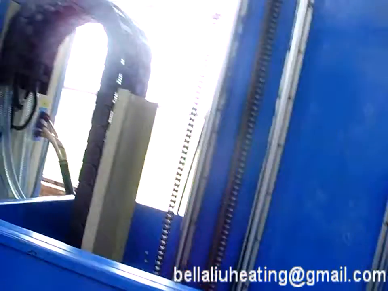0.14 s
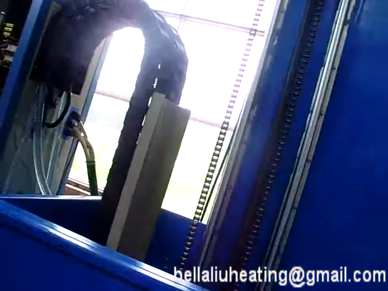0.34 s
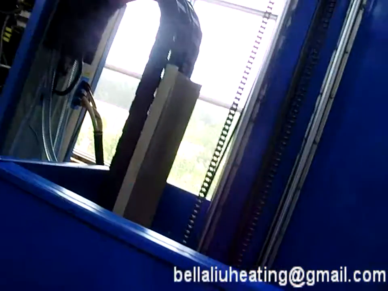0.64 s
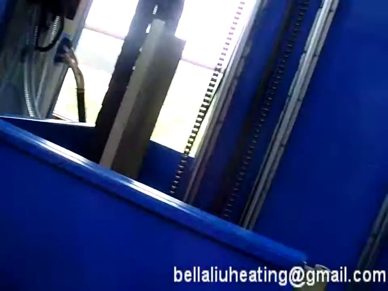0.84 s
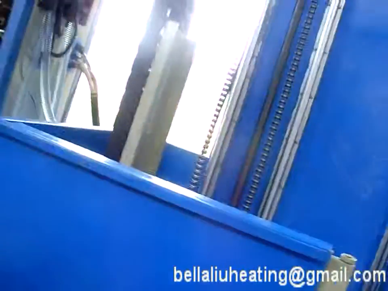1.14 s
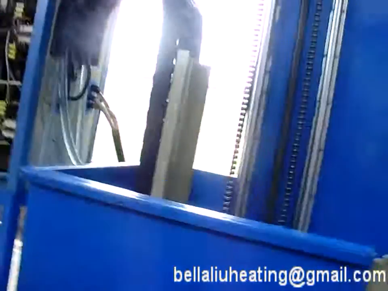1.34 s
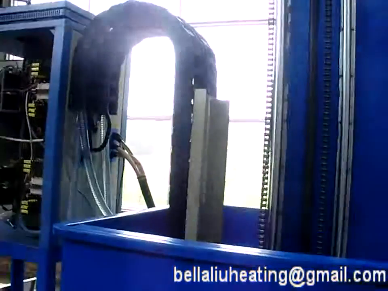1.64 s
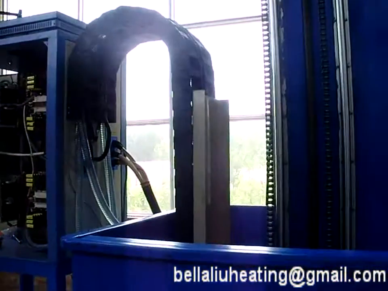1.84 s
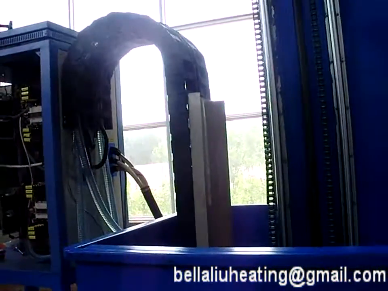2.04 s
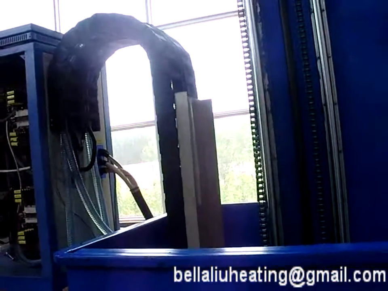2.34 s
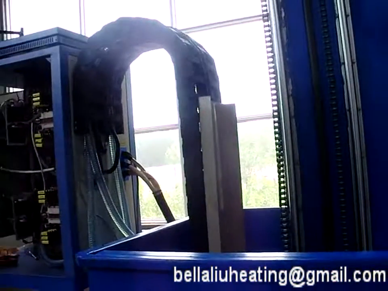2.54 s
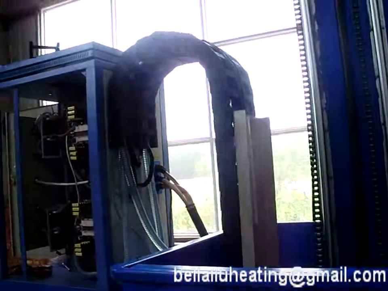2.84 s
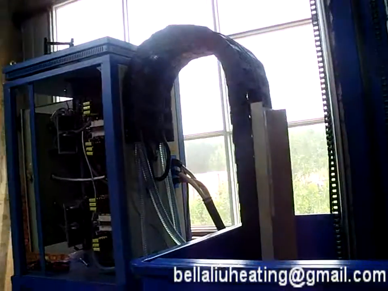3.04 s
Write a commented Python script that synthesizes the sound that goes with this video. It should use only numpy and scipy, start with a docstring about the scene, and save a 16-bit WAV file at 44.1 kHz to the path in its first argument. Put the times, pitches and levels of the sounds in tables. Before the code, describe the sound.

Steady dense machine roar and throbbing hum in a workshop, with irregular dull chain clacks.

```python
"""An industrial machine runs steadily: fans and pumps roar through the casing, as two bands of noise.
A thin patchy top, left around 4 kHz by earlier processing, is a third noise that follows the roar.
Two motor shafts hum as sines at multiples of their speeds, amid loose tones, a drone and a throbbing hum.
A thin high ring swells near 1 s, then flickers away, with a mirror image from earlier 8 kHz sampling.
A drive chain ticks and clacks, as noise bursts dulled by a small camera microphone, over faint hiss."""
import sys
import numpy as np
from scipy import signal
from scipy.fft import rfft, irfft, next_fast_len
from scipy.io import wavfile
from scipy.ndimage import uniform_filter1d, map_coordinates

SR = 44100
rng = np.random.default_rng(int(sys.argv[2]) if len(sys.argv) > 2 else 0)


def wrap_up_sound(samples):
    """Save the sound to the file named by the first command line argument, as 16-bit audio."""
    columns = np.atleast_2d(samples).T
    # keep every value between -1 and 1, then stretch to whole-number steps
    tamed = np.clip(columns, -1, 1)
    steps = np.round(tamed * 32767).astype(np.int16)
    wavfile.write(sys.argv[1], SR, steps)


def gain_from_decibels(decibels):
    """Convert decibel values to linear amplitude factors."""
    exponent = np.asarray(decibels, float) / 20
    return 10 ** exponent


N = 141120
T = np.arange(N) / SR


def unit(x):
    """Scaled to rms 1."""
    return x / np.sqrt(np.mean(x ** 2) + 1e-20)


def along(points, hz):
    """Interpolates (Hz, value) points on a log frequency axis."""
    point_hz, value = np.transpose(points)
    return np.interp(np.log(hz + 1), np.log(point_hz + 1), value)


def curve(rows):
    """One value per sample from (s, value) rows."""
    return np.interp(T, *np.transpose(rows))


def wobble(knots_per_s):
    """A smooth random curve through normally distributed knots."""
    knots = rng.standard_normal(int(N * knots_per_s / SR) + 4)
    return map_coordinates(knots, [T * knots_per_s])


def filtered(x, response):
    """x times a response of frequency."""
    m = next_fast_len(len(x) + 8192)
    return irfft(rfft(x, m) * response(np.fft.rfftfreq(m, 1 / SR)), m)[:len(x)]


def noise(spectrum, patchy_db):
    """Coloured noise of rms 1, its gain patchy over time and frequency."""
    white = signal.stft(rng.standard_normal(N), nperseg=512)[2]
    patches = uniform_filter1d(rng.standard_normal(white.shape), size=5, axis=0)
    patches = unit(uniform_filter1d(patches, size=8, axis=1))
    x = signal.istft(white * gain_from_decibels(patchy_db * patches), nperseg=512)[1][:N]
    return unit(filtered(x, lambda hz: gain_from_decibels(along(spectrum, hz))))


def tone(pitch_hz, level_db, waver_db):
    """A sine of given rms level, its phase drifting and its level wavering."""
    drift_rad = 0.6 * wobble(3)
    phase_rad = 2 * np.pi * (pitch_hz * T + rng.random()) + drift_rad
    return np.sqrt(2) * gain_from_decibels(level_db + waver_db * wobble(3)) * np.sin(phase_rad)


# level of the low roar: time_s, level_db [rms]
ROAR_LEVEL = [(0.0, -17), (0.03, -18.5), (0.99, -18.5), (1.03, -17), (1.05, -18), (1.49, -20),
              (1.52, -16.5), (1.94, -20), (2.01, -17.5), (2.03, -19.5), (2.17, -17), (2.22, -19),
              (2.7, -19), (2.74, -16.5), (2.91, -19.5), (3.2, -19)]
# colours of low roar and upper rush: freq_hz, density_db [per Hz, relative]
BODY_COLOUR = [(18, -57), (30, -21.5), (96, -14.5), (124, -6.5), (162, -19.5), (196, -9), (236, -12),
               (265, -7), (463, 0), (495, 1), (567, -1.5), (607, -3), (957, -2.5), (1410, -12.5),
               (1700, -17), (2210, -49), (3740, -120)]
RUSH_COLOUR = [(900, -21.5), (1300, -6.5), (1400, -8.5), (1840, -3.5), (2400, -3), (2920, -4), (3300, -8),
               (3650, -12.5), (3780, -13.5), (3900, -27), (4300, -59), (4600, -120)]
# colour of the patchy top left by earlier processing: freq_hz, density_db [per Hz, relative]
PATCHY_TOP_COLOUR = [(3300, -40), (3700, -6.5), (3850, 0), (4000, -1.5), (4300, -1.5), (4600, -7),
                     (4900, -16.5), (5050, -21.5), (5250, -40), (5420, -55), (5600, -89)]


def roar():
    """Air and casing noise in two bands, plus a thin patchy top left around 4 kHz by earlier processing."""
    rush_db, patchy_top_db = -28.5, -50.5
    follow_share = 0.5  # of the low roar's swell in dB, taken by rush and top
    body_db = curve(ROAR_LEVEL)
    upper_db = follow_share * (body_db - body_db.mean()) + 0.34 * wobble(8)
    body = gain_from_decibels(body_db) * noise(BODY_COLOUR, patchy_db=0.74)
    rush = gain_from_decibels(rush_db + upper_db) * noise(RUSH_COLOUR, patchy_db=1.08)
    patchy_top_gain = gain_from_decibels(patchy_top_db + upper_db + 0.58 * wobble(12))
    patchy_top = patchy_top_gain * noise(PATCHY_TOP_COLOUR, patchy_db=2.0)
    return body + rush + patchy_top


# shaft harmonics: order [multiple of shaft speed], level_db [rms before waver]
SHAFT_A_ORDERS = {3: -44, 4: -50.5, 5: -43, 7: -45, 11: -37, 12: -44.5, 14: -40, 17: -35, 22: -40, 23: -31,
                  35: -51.5}
SHAFT_B_ORDERS = {6: -48, 11: -47.5, 12: -38.5, 13: -37.5, 14: -40.5}
# loose steady tones, in pairs: pitch_hz; level_db [rms before waver]
LOOSE_HZ = [62.8, 132.5, 376.8, 388.6, 482.1, 612.2, 643, 707.4, 723.5, 755.2, 827.8, 865.5, 931.4, 1060,
            1124.7, 1184.8]
LOOSE_DB = [-55.5, -40.5, -40, -38, -42.5, -45, -44, -38.5, -40, -39.5, -39.5, -38.5, -40.5, -42, -39.5,
            -43]


def shafts():
    """Sines at multiples of two close shaft speeds, plus loose tones."""
    shaft_a_hz, shaft_b_hz = 24.6, 24.98
    lines = [(order * shaft_a_hz, level_db) for order, level_db in SHAFT_A_ORDERS.items()]
    lines += [(order * shaft_b_hz, level_db) for order, level_db in SHAFT_B_ORDERS.items()]
    lines += list(zip(LOOSE_HZ, LOOSE_DB))
    return sum(tone(pitch_hz, level_db, waver_db=2) for pitch_hz, level_db in lines)


# level of the drone: time_s, level_db [rms before waver]
DRONE_LEVEL = [(0.0, -32), (0.95, -26.5), (0.99, -39), (1.02, -22), (1.13, -32.5), (2.14, -27), (2.24, -38),
               (2.76, -29), (3.2, -40.5)]


def drone():
    """One strong sine of changing level."""
    return tone(508.9, curve(DRONE_LEVEL), waver_db=1.4)


# level of the throbbing hum: time_s, level_db [rms before waver]
THROB_LEVEL = [(0.0, -45), (0.63, -29.5), (0.96, -46.5), (1.07, -29), (1.4, -40), (1.55, -33),
               (1.67, -50.5), (1.82, -38), (2.08, -27.5), (2.18, -38), (2.41, -33.5), (2.5, -39.5),
               (2.83, -28.5), (2.89, -45), (2.93, -40), (3.2, -40)]


def throb():
    """A low sine that swells and sinks repeatedly."""
    return tone(197.8, curve(THROB_LEVEL), waver_db=-0.5)


# the ring, then its mirror image about 4 kHz: pitch_hz
RING_AND_IMAGE_HZ = [3932.3, 4068]
# level of the ring: time_s, level_db [rms before waver]
RING_LEVEL = [(.82, -81), (.87, -55), (.99, -47), (1.03, -61), (1.09, -53), (1.2, -64), (1.3, -54),
              (1.4, -57), (1.6, -59), (1.9, -78)]


def high_ring():
    """A thin high sine, and a second as its mirror image about 4 kHz from earlier 8 kHz sampling."""
    image_offset_db = -2
    ring_hz, image_hz = RING_AND_IMAGE_HZ
    ring = tone(ring_hz, curve(RING_LEVEL), waver_db=-2.2)
    image = tone(image_hz, curve(RING_LEVEL) + image_offset_db, waver_db=-2.2)
    return ring + image


def burst(centre_hz, width_hz, decay_s):
    """Noise in one resonance: quick exponential rise, Gaussian fall."""
    rise_s = 0.002
    t = np.arange(SR // 8) / SR

    def resonance(hz):
        damping = 1j * hz * width_hz
        return damping / (centre_hz * centre_hz - hz * hz + damping)

    envelope = (1 - np.exp(-t / rise_s)) * np.exp(-(t / decay_s) ** 2)
    return unit(filtered(rng.standard_normal(len(t)), resonance)) * envelope


# clacks: start_s, level_db [rms before envelope and microphone], centre_hz, width_hz, decay_s
CLACK_HITS = [(.002, -22.5, 2650, 704, 0.034), (0.148, -30.5, 3100, 2500, .015),
              (0.183, -24.5, 2900, 600, 0.009), (0.554, -26.5, 2200, 1500, .03),
              (0.989, -29, 1200, 201, 0.034), (1.005, -22.5, 480, 150, 0.055),
              (1.501, -28.5, 3500, 2500, .015), (1.925, -27, 2850, 600, .01), (2.09, -32.5, 1950, 500, .03),
              (2.135, -24.5, 3000, 2500, .03), (2.501, -36, 3500, 2500, .012),
              (2.613, -18.5, 3200, 2480, 0.0099), (2.941, -27.5, 2700, 1800, .025),
              (3.04, -22, 1200, 250, .025), (3.042, -29, 2500, 600, 0.018)]
# microphone response to the hits: freq_hz, gain_db
MIC_RESPONSE = [(100, 3.5), (3000, 5), (3700, -5.5), (4500, -14), (5000, -31), (5400, -78.5)]


def chain():
    """Drive chain: listed clacks over randomly timed small ticks, mostly faint, through a dull microphone."""
    ticks_per_s, floor_db, spread_db = 27, -40.5, 1.5
    base_hz, width_hz, decay_s = 3300, 2000, 0.004
    hits = list(CLACK_HITS)
    for when, rarity, colour in rng.random((int(ticks_per_s * N / SR), 3)):
        level_db = floor_db - spread_db * np.log(rarity + 1e-3)
        centre_hz = base_hz * (0.78 + 0.6 * colour)
        hits.append((when * N / SR, level_db, centre_hz, width_hz, decay_s))
    out = np.zeros(N + SR)
    for start_s, level_db, centre_hz, width_hz, decay_s in hits:
        out[round(start_s * SR):][:SR // 8] += gain_from_decibels(level_db) * burst(centre_hz, width_hz, decay_s)
    return filtered(out[:N], lambda hz: gain_from_decibels(along(MIC_RESPONSE, hz)))


def scene():
    """All layers but the hiss, one channel."""
    return (roar() + shafts() + drone() + throb() + high_ring() + chain())[None]


# colour of the hiss: freq_hz, density_db [per Hz, relative]
HISS_COLOUR = [(5000, -10.5), (6500, -6), (7500, 1.5), (10000, 2), (10600, -3.5), (11500, 2), (13500, -0.5),
               (14500, -6), (15700, -9)]


def electronic_hiss():
    """Faint, mostly high noise."""
    level_db = -91
    return gain_from_decibels(level_db) * noise(HISS_COLOUR, patchy_db=0.2)


def top_cut(x):
    """Nothing passes above the cut-off."""
    return signal.sosfilt(signal.butter(12, 15700, fs=SR, output="sos"), x)


def record(dry):
    """Adds hiss and a small constant offset to the dry sound."""
    offset = -0.0039  # of full scale
    mix = dry + electronic_hiss() + offset
    return top_cut(mix)


dry = scene()
out = record(dry)
wrap_up_sound(out)
```